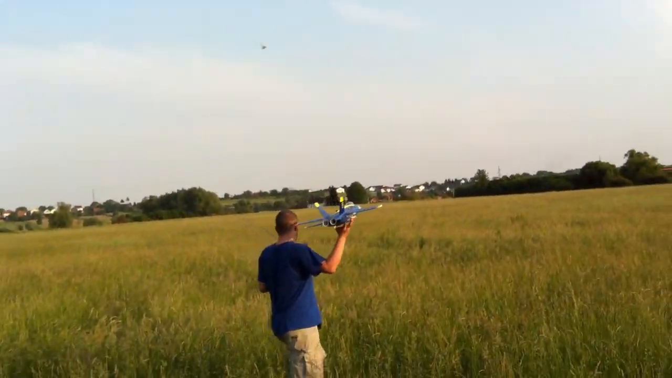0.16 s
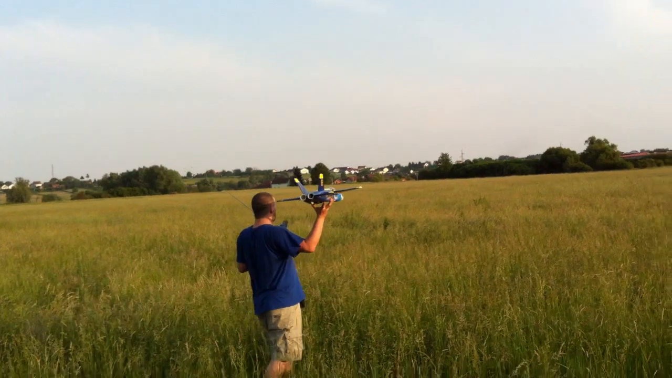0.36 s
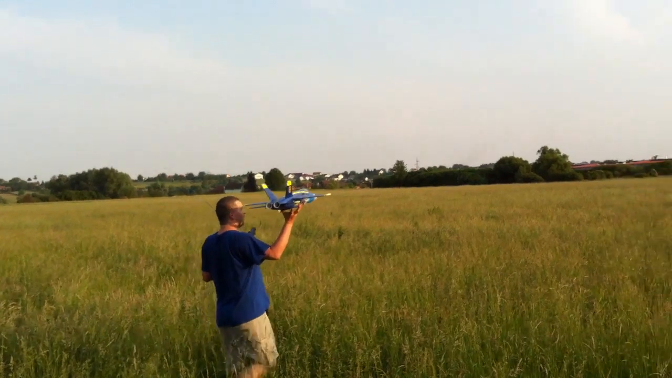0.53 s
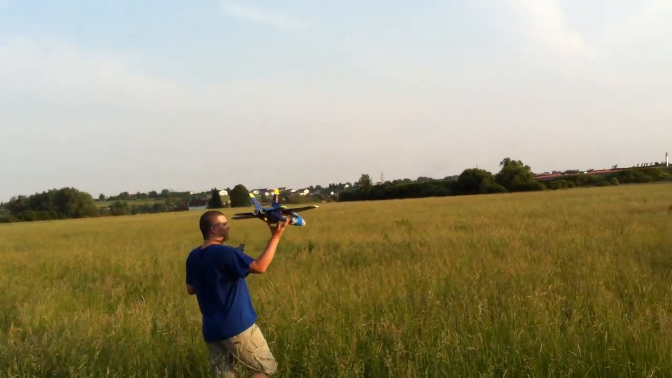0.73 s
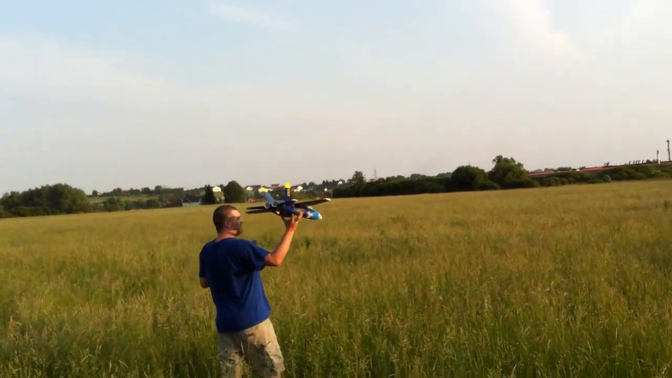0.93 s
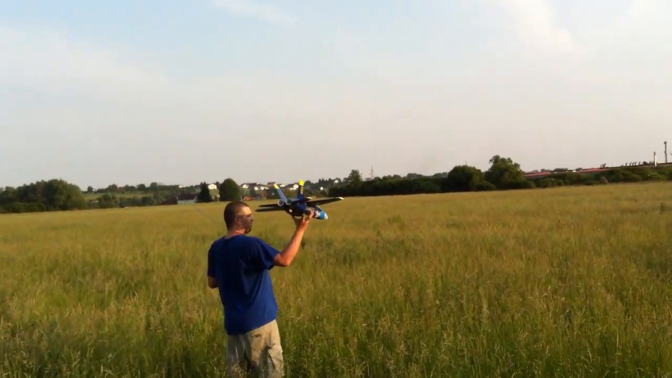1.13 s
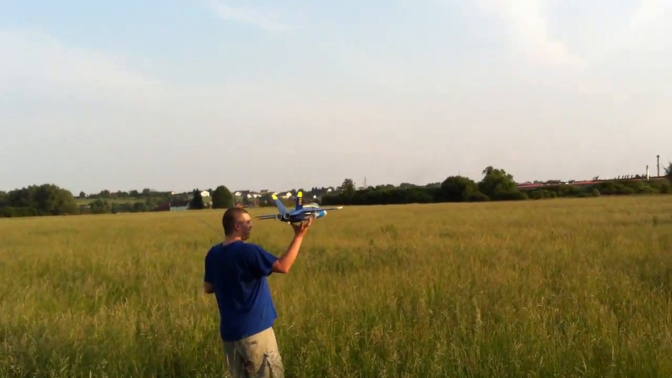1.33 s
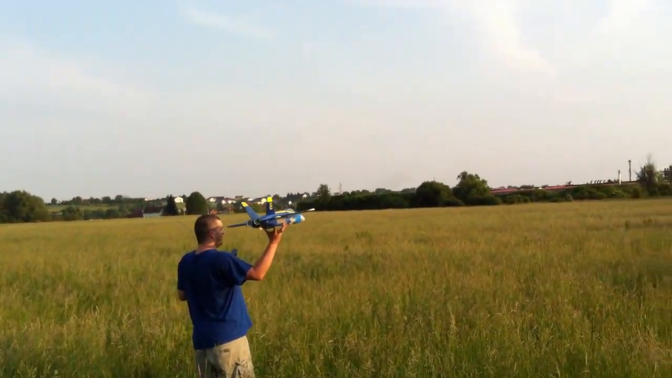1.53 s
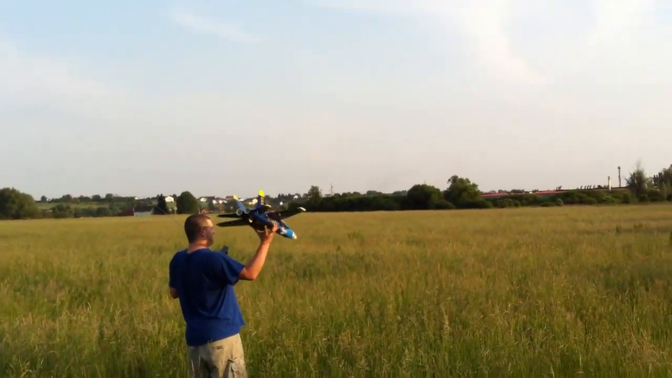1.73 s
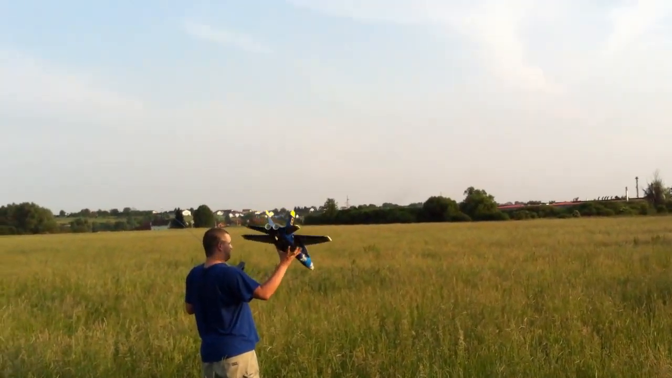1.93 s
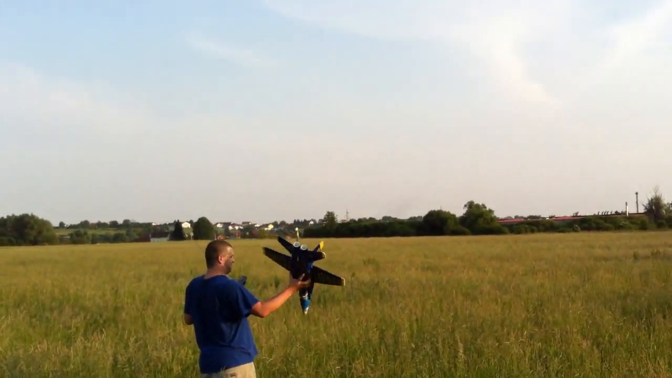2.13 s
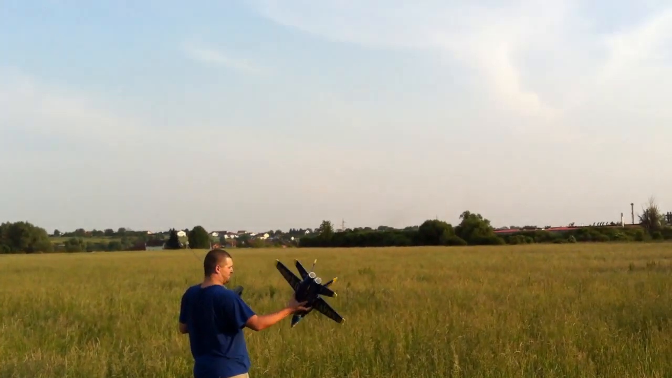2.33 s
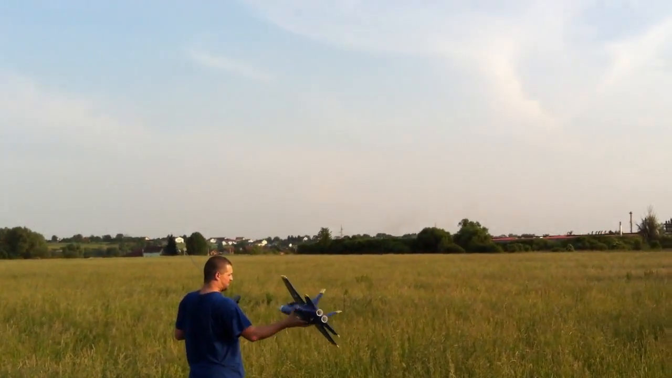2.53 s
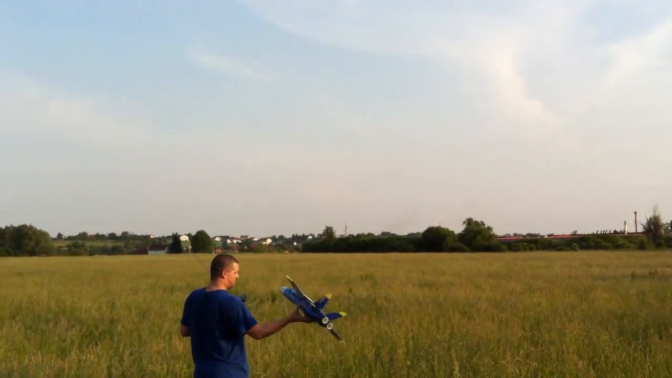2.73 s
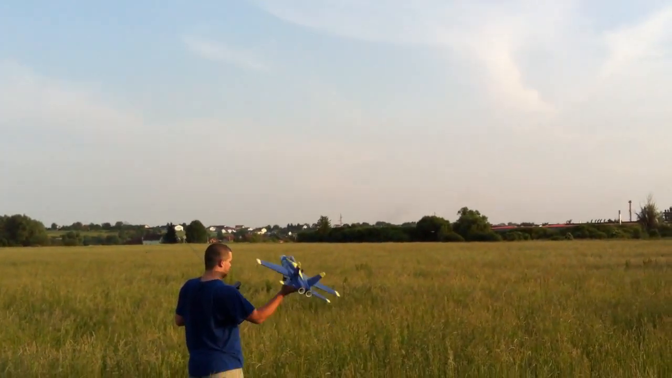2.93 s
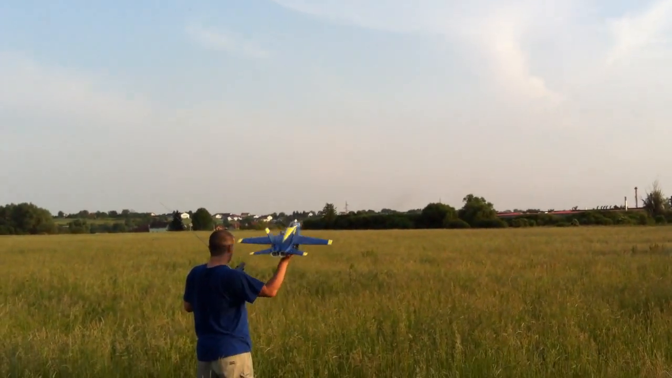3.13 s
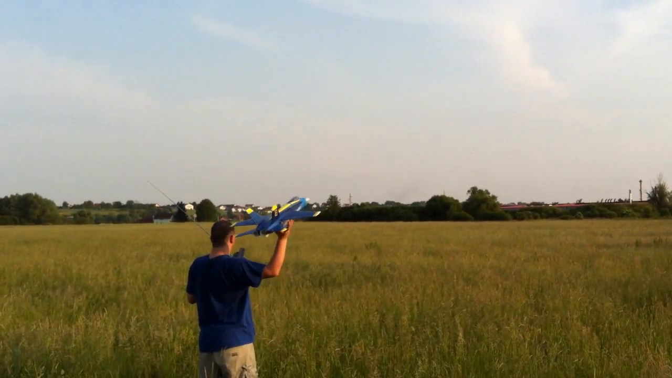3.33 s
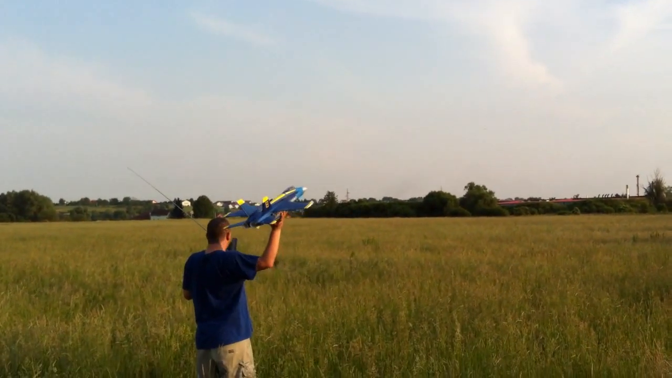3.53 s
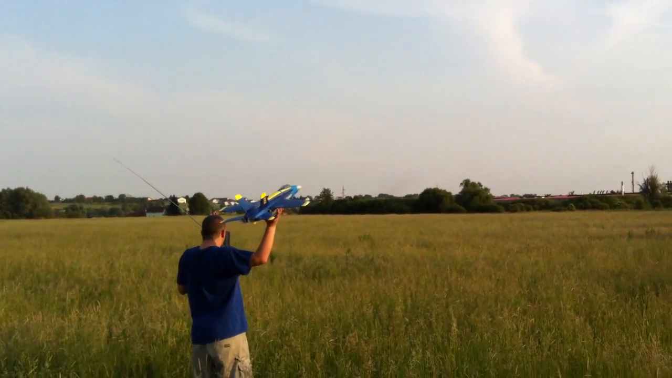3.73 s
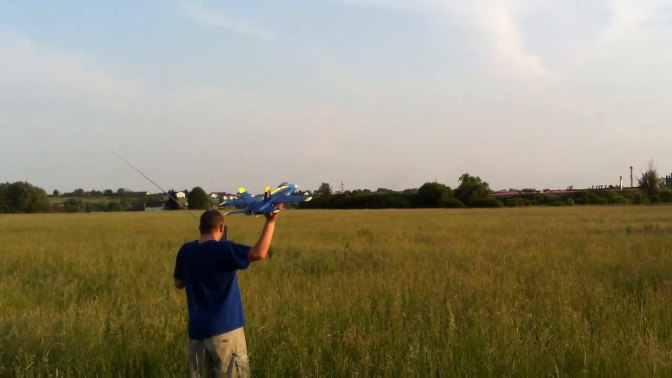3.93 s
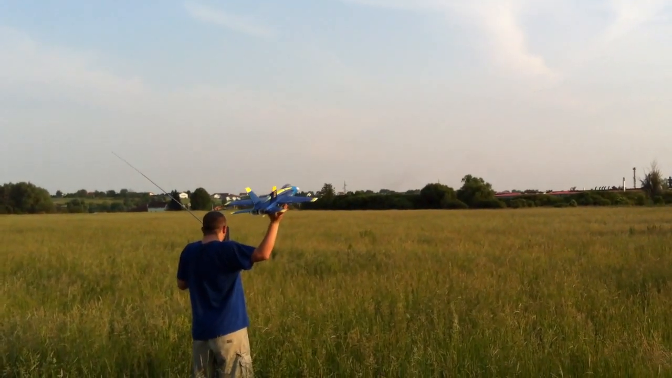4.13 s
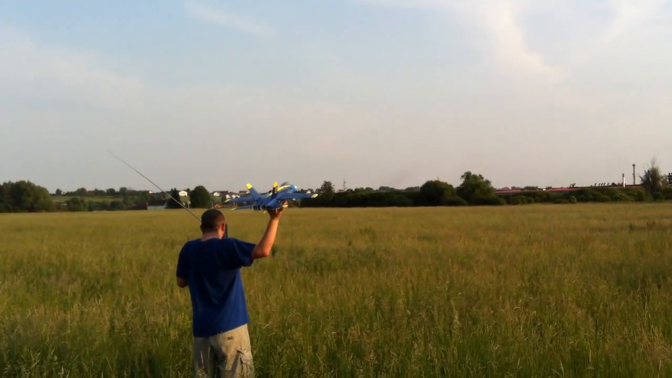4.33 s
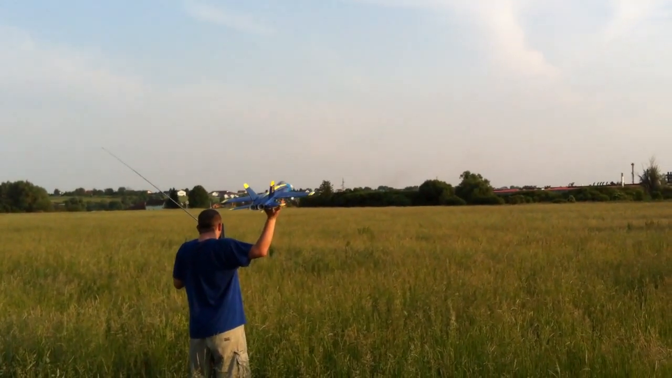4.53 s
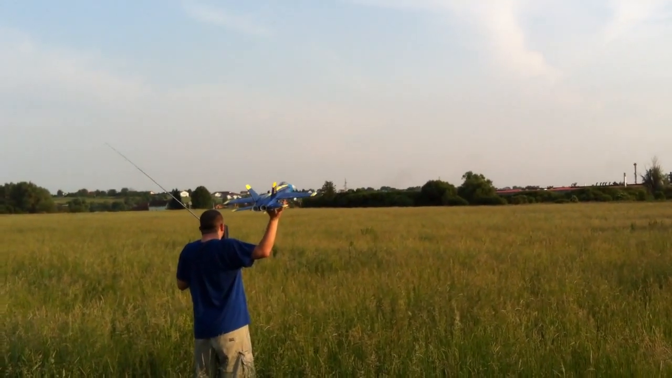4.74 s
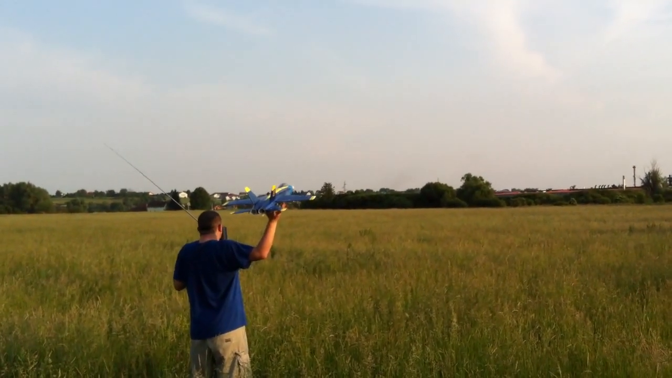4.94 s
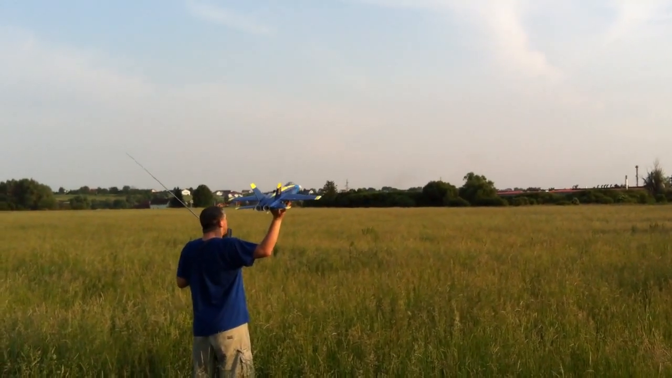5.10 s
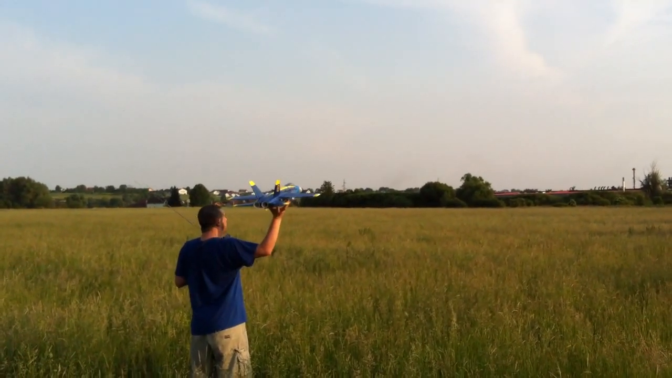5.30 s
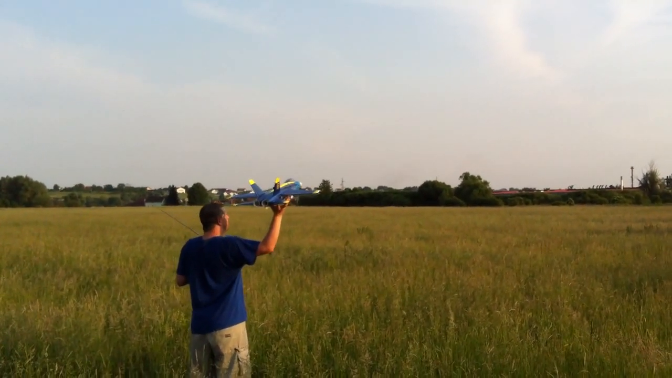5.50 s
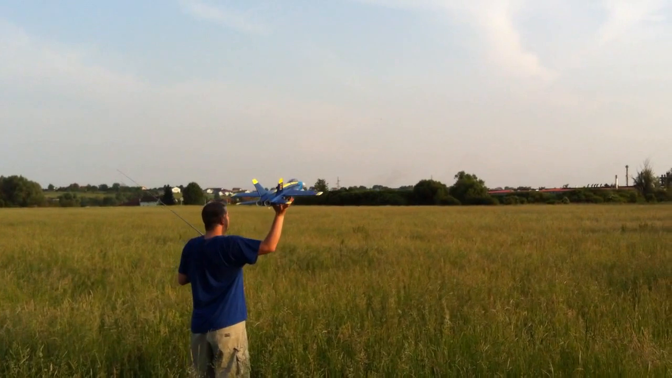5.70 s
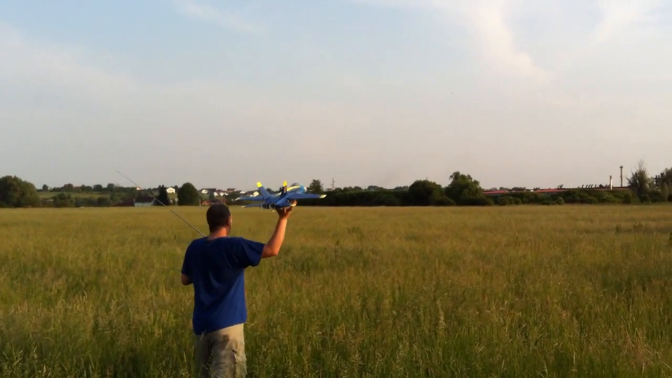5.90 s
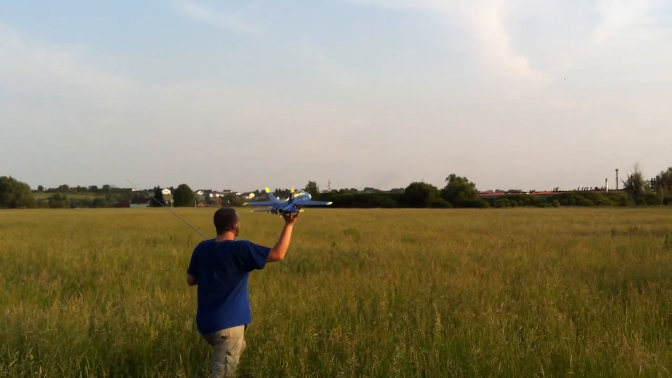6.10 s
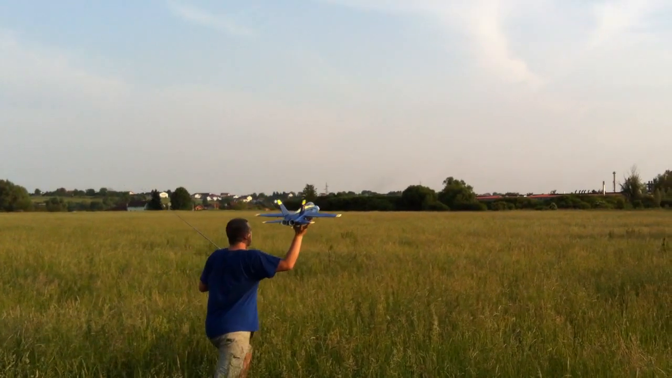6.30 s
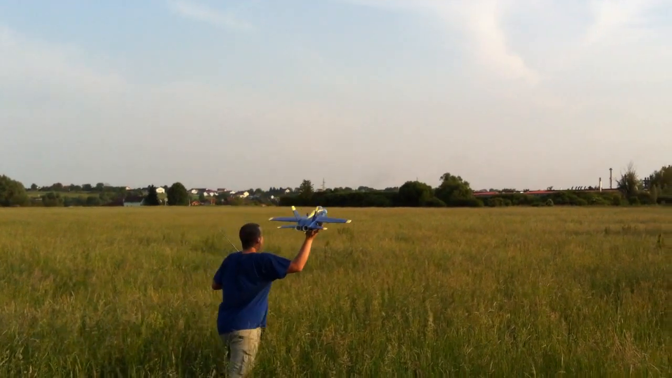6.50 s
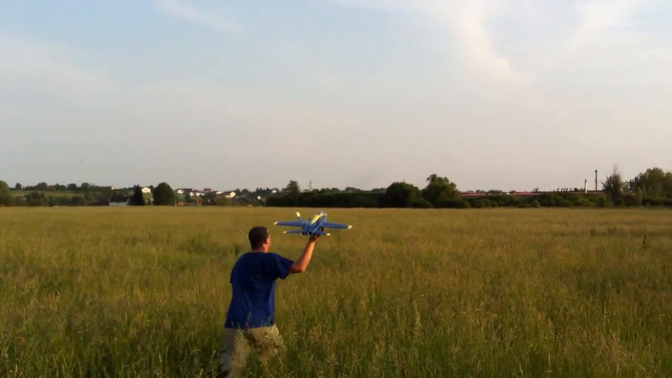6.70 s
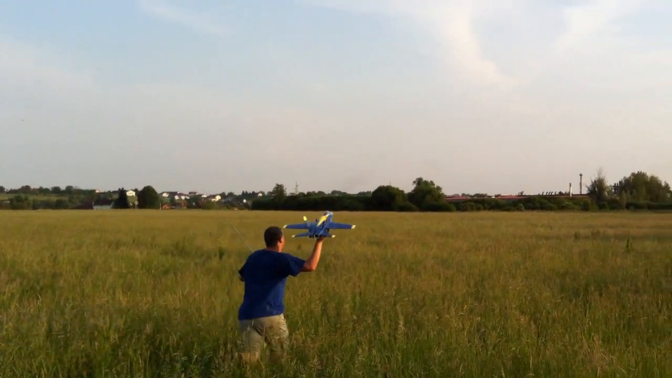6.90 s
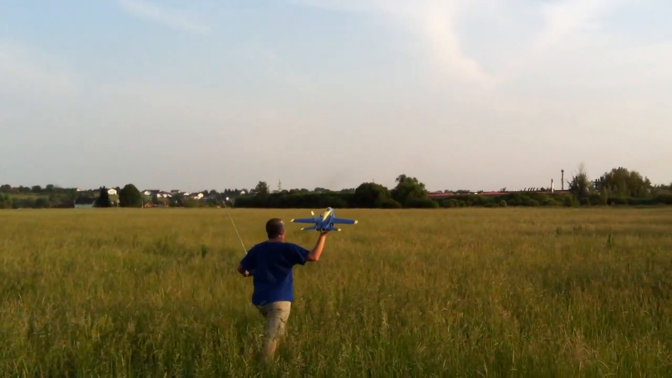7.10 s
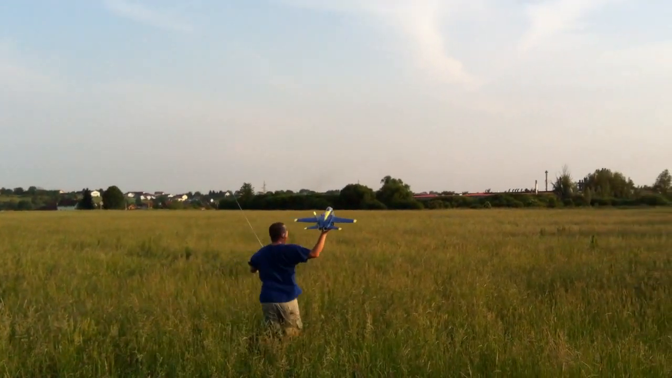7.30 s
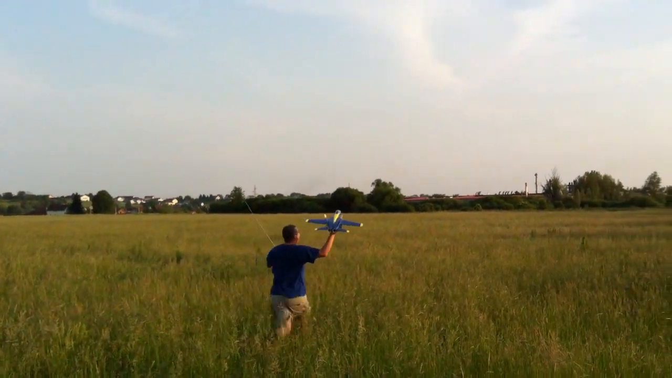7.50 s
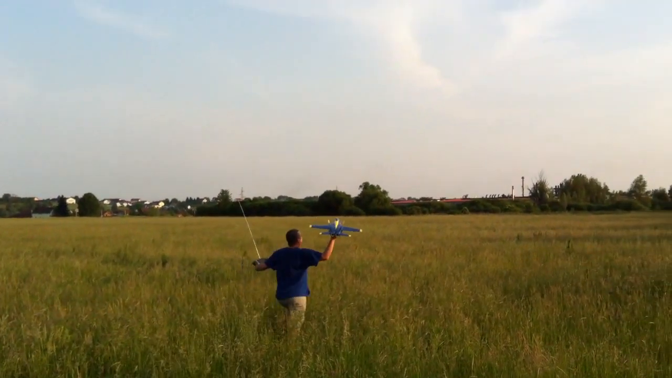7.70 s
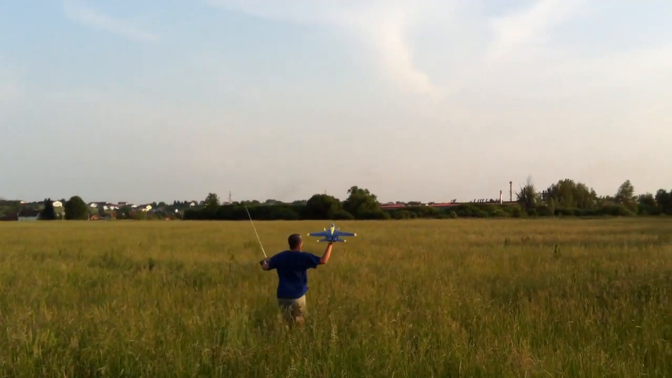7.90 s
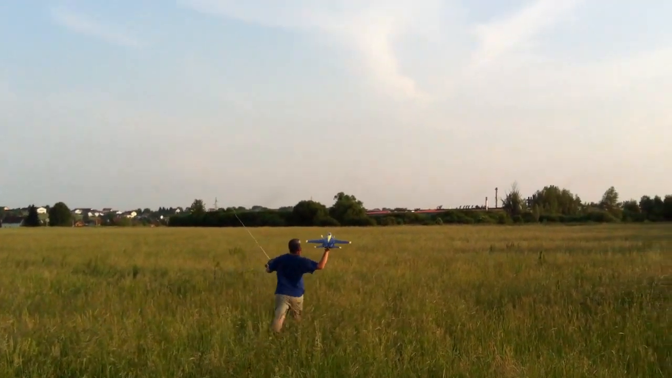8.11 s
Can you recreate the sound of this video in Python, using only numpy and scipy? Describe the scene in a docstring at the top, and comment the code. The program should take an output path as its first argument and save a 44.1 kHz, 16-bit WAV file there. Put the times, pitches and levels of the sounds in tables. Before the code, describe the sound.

Grass swishes and stalks snap amid cricket chirps; near five seconds a model jet's ducted fan whistles, surges into a rushing whine, then fades.

```python
"""A summer meadow, where a model jet with a five-bladed electric ducted fan is held up, then carried away.
Crickets chirp by pulsed tones, a far bird slurs its pitch, and long grass swishes as shaped grainy noise.
The motor controller whistles at its switching rate; the fan spools up and sounds orders of its shaft speed.
Filtered noise, echoed by the ground, makes the rush of air; whine and rush fade with distance and battery sag.
One microphone stands a few metres behind."""
import sys
import numpy as np
from scipy import signal
from scipy.fft import rfft, irfft
from scipy.io import wavfile
from scipy.ndimage import uniform_filter1d, map_coordinates

SR = 44100
rng = np.random.default_rng(int(sys.argv[2]) if len(sys.argv) > 2 else 0)


def to_wav(s):
    """Save 16-bit WAV."""
    ch = np.atleast_2d(s).T  # columns
    pcm = np.round(np.clip(ch, -1, 1) * 32767)  # PCM
    wavfile.write(sys.argv[1], SR, pcm.astype(np.int16))


N = 359415
T = np.arange(N) / SR

# Noise colours, as relative spectral density: f/Hz, level/dB per Hz
# distant hush of still evening air with far traffic
FIELD_COLOUR = [(25, -34), (55, -22), (100, -13.5), (175, 1.5), (260, -4), (420, -4), (660, -2),
                (1000, -12), (1700, -9), (2300, -19.5), (4000, -18.5), (7000, -23.5), (11000, -27.5),
                (16000, -27.5)]
# bright hiss of grass blades
SWISH_COLOUR = [(800, -10), (2500, -2.5), (4000, 1), (7000, -1.5), (12000, -3), (16000, -2)]
# low rustle of stalks
CRUSH_COLOUR = [(100, -20), (250, -2), (800, 4), (1550, 0), (2150, -2), (2800, -9), (6000, -26)]
# air rushing in the duct
RUSH_COLOUR = [(60, -60), (500, -20), (950, -1.5), (1450, -4.5), (1800, -6.5), (2400, -3), (3300, -2),
               (4200, 2), (5300, -6), (6800, -2.5), (9500, -8), (13500, -10.5), (14700, -16.5),
               (16000, -20.5)]
# exhaust behind the duct
EXHAUST_COLOUR = [(30, -50), (70, -38.5), (160, -10), (240, -1.5), (320, -4), (450, -1.5), (620, 2.5),
                  (700, -2), (820, -11.5), (1400, -25.5)]
# rough buzz of the motor controller
BUZZ_COLOUR = [(200, -20), (480, -9), (680, 6), (820, 0), (1000, 10.5), (1250, -6), (2000, 1.5),
               (4000, -28), (5600, -13), (6500, 3), (7200, -2), (8400, -3), (9200, -42)]

# soft rustling swells: t/s at the height, swell width/s, bright hiss level/dB, low rustle level/dB
RUSTLES = [(.13, 0.042, -58.5, -68), (.45, 0.11, -52.5, -51.5), (.62, 0.052, -63, -46.5),
           (.77, 0.049, -54.5, -54.5), (1.29, 0.12, -53.5, -56.5), (1.65, 0.11, -68, -60),
           (2.55, .12, -72, -60.5)]
# stalks snapping: t/s, peak level/dB, ring f/Hz, bandwidth/Hz, 60 dB decay time/s
SNAPS = [(.241, -43, 900, 1200, 0.019), (.308, -38, 878, 697, 0.056), (.452, -33.5, 4120, 900, 0.0089),
         (.468, -32.5, 1450, 900, .014), (.553, -44, 7520, 4920, .008), (.56, -33, 1200, 903, 0.016),
         (1.277, -36, 8100, 9000, .06), (1.616, -44.5, 970, 1530, 0.047), (2.62, -51, 7100, 9000, 0.011)]
# chirps close by: start t/s, level/dB before the common trim, number of wing strokes
NEAR_CHIRPS = [(.057, -46.5, 4), (.322, -47, 4), (.588, -46.5, 4), (.873, -45.5, 4), (1.166, -44.5, 4),
               (1.604, -44.5, 4), (2.026, -45.5, 4), (2.14, -53, 4), (2.283, -44, 4), (2.476, -53.5, 4),
               (2.553, -44.5, 4), (2.83, -43.5, 4), (3.118, -44, 2), (3.429, -44.5, 4), (3.704, -45, 4),
               (3.995, -44.5, 4), (4.278, -44, 4), (4.605, -44, 4), (4.908, -45, 4)]
# strokes of one chirp: t/s after the first, level/dB within the chirp, length/s
STROKES = [(0, -6, 0.02), (0.028, -2, .019), (0.062, -1, 0.022), (.104, -1.5, 0.019)]
# far crickets: wing f/Hz, period/s between chirps, greatest level/dB before stroke levels
FAR_CRICKETS = [(4990, .37, -60), (4930, .43, -61)]
# phrases of the far bird: start t/s, length/s
BIRD_PHRASES = [(2.382, 0.13), (2.905, 0.52), (3.83, .38), (4.333, 0.25)]
# shaft tone as the jet tilts: t/s, level/dB against the tone reference
SHAFT_TONE = [(5.0, 5), (5.08, 12), (5.28, -4.5), (5.36, 7), (5.48, -16), (5.72, -2), (6.2, -4),
              (6.32, 0.5), (7.0, 8.5), (7.12, -8), (7.16, 6), (7.68, 7.5), (7.8, -2.5), (8.15, 3)]
# blade tone as the jet tilts: t/s, level/dB, level/dB of its octave, both against the tone reference
BLADE_TONE = [(5.14, 3.5, -9), (5.21, 10.5, -11), (5.28, 4.5, 0), (5.41, 11.5, 2), (5.46, 1, 2),
              (5.54, 8, -1), (5.72, 9.5, 1.5), (6.14, -1.5, 4), (6.36, 5.5, 1), (6.6, -2.5, 0.5),
              (7.02, -3, -2), (7.16, 3, 1.5), (7.32, -4, 2), (7.47, 5.5, -1.5), (7.76, -3.5, 2.5),
              (8.15, 3.5, -5)]
# weaker orders: multiple of shaft f, level/dB while speeding up, level/dB at full speed, against the reference
WEAK_ORDERS = [(2, -13, -12.5), (3, -2.5, -7), (4, -4, -10), (6, -14, -14), (7, -15, -15), (8, -24, -9.5),
               (9, -13, -14), (13, -20, -26), (15, -12, -7), (20, -24, -17)]

FIELD_DB = -57.5
# grass keeps brushing the legs until they come to rest
BRUSH_DB, BRUSH_UNTIL_S, BRUSH_FADE_DB_PER_S = -60.5, 1.2, 18
# later on a neighbour falls in just behind each near chirp, at a level relative to it
ANSWER_FROM_S, ANSWER_LAG_S, ANSWER_DB = 3.6, .081, -8
BLADES, COMMUTATIONS_PER_TURN = 5, 6
# the rotor kicks off and speeds up along an S-curve; the exponent delays it
START_S, SPOOL_S, SPOOL_LATENESS = 4.84, .66, 1.08
KICK_HZ, FULL_HZ = 22, 743
# eventual loss of shaft speed as the battery sags, and its time constant
SAG_FROM_S, SAG_HZ, SAG_TIME_S = 5.63, 64.6, 5
# the jet is held still, then carried off; heights of jet and microphone are summed
DISTANCE_M, RUN_FROM_S, RUN_M_S, HEIGHTS_M = 4.25, 6.35, 2.44, 3.3
SOUND_M_S = 343
# level at full speed before the run, gain per doubling of shaft speed, loss per doubling of distance
TONE_REF_DB, RUSH_SPEED_DB, RUSH_DISTANCE_DB = -38, 13.5, 7
RUSH_ABOVE_REF_DB = 8.5
EXHAUST_DB, EXHAUST_SPEED_DB, EXHAUST_DISTANCE_DB = -37, 15.5, 6
# the controller's whistle grows with the throttle, then fades; it is gone before full throttle
WHISTLE_DB, WHISTLE_PEAK_S, WHISTLE_END_S = -32, 5.1, 5.32
WHISTLE_RISE_DB_PER_S, WHISTLE_FALL_DB_PER_S = 30, 62
# one missed beat as the motor catches: delay of its centre and Gaussian width
STUTTER_AFTER_S, STUTTER_S = .013, .003
# switching rate extrapolated to rest, and its rise at full speed
SWITCH_HZ, SWITCH_LOAD_HZ = 7911, 40
TOP_HZ = 15700


def undb(db):
    """Logarithmic levels: decibels become an amplitude ratio."""
    return 10 ** (np.asarray(db) / 20)


def curves(table):
    """Linear interpolation: table columns become straight-line courses in time."""
    s, *columns = np.transpose(table)
    return [np.interp(T, s, c) for c in columns]


def unit(x):
    """Normalisation: the signal is scaled to rms 1."""
    return x / np.sqrt(np.mean(x ** 2))


def noise(colour):
    """Spectral shaping: white noise is weighted along a log-frequency colour, then set to rms 1."""
    hz, db = np.transpose(colour)
    f = np.maximum(np.arange(N // 2 + 1) * SR / N, 1)
    weight = undb(np.interp(np.log(f), np.log(hz), db))
    return unit(irfft(rfft(rng.standard_normal(N)) * weight, N))


def walk(rate):
    """Band-limited chance: smoothed random steps of rms 1 change about rate times a second."""
    k = max(int(SR / rate), 1)
    held = np.repeat(rng.standard_normal(N // k + 1), k)
    return unit(uniform_filter1d(uniform_filter1d(held, k), k)[:N])


def turn(hz):
    """Phase as the integral of frequency, in radians."""
    return 2 * np.pi * np.cumsum(hz) / SR


def tone(phase, db):
    """Simple harmonic motion: a sine of the given rms level."""
    return np.sqrt(2) * undb(db) * np.sin(phase)


def add(out, s, x):
    """Superposition: a short sound is added in place from time s."""
    i = max(int(s * SR), 0)
    out[i:i + len(x)] += x[:max(len(out) - i, 0)]


def field(swell_db=1.0):
    """Slow amplitude modulation: the distant hush swells gently."""
    return noise(FIELD_COLOUR) * undb(FIELD_DB + swell_db * walk(1.6))


def grass(grain_db=2.0):
    """Friction and fracture: grainy hiss and low rustle swell softly, and a few stalks snap resonantly."""
    hiss = undb(BRUSH_DB - BRUSH_FADE_DB_PER_S * np.maximum(T - BRUSH_UNTIL_S, 0))
    rustle = 0
    for s, swell_s, hiss_db, rustle_db in RUSTLES:
        swell = np.exp(-.5 * ((T - s) / swell_s) ** 2)
        # independent noises add in power
        hiss = np.hypot(hiss, undb(hiss_db) * swell)
        rustle = np.hypot(rustle, undb(rustle_db) * swell)
    out = unit(noise(SWISH_COLOUR) * undb(grain_db * walk(700))) * hiss
    out += unit(noise(CRUSH_COLOUR) * undb(grain_db * walk(180))) * rustle
    t = T[:SR // 10]
    for s, db, hz, width, t60 in SNAPS:
        fibres = rng.standard_normal(len(t)) * np.exp(-np.log(1000) * t / t60)
        b, a = signal.iirpeak(hz, hz / min(width, SR / 3), fs=SR)
        ring = signal.lfilter(b, a, fibres)
        snap = signal.lfilter(b, a, ring + 0.23 * fibres)
        add(out, s, undb(db) * snap / np.abs(snap).max())
    return out


def stroke(length, hz, droop=0.043, slip=0.044):
    """Stridulation: a wing's scraper runs along the file, slowing as it goes and dropping off at the end."""
    u = np.linspace(0, 1, int(length * SR))
    phase = turn(hz * (1 - droop * u - slip * u ** 12))
    envelope = np.sin(np.pi * u ** 1.4).clip(0) ** 0.38
    return envelope * (tone(phase, 0) + tone(2 * phase, -29.5))


def chirp(hz, count):
    """Pulse train: a short run of wing strokes, each a little different in pitch and level."""
    out = np.zeros(SR // 5)
    for lag, db, length in STROKES[:count]:
        pitch, loud = rng.standard_normal(2)
        add(out, lag, undb(db + 0.85 * loud) * stroke(length, hz * (1 + .004 * pitch)))
    return out


def crickets(wing_hz=4880, near_trim_db=-2.0):
    """Periodic chorusing: near crickets chirp, a neighbour answers, far ones keep their own beat."""
    out = np.zeros(N)
    for s, db, count in NEAR_CHIRPS:
        level_db = db + near_trim_db
        add(out, s, undb(level_db) * chirp(wing_hz, count))
        if s > ANSWER_FROM_S:
            add(out, s + ANSWER_LAG_S, undb(level_db + ANSWER_DB) * chirp(wing_hz, count=4))
    for hz, period, db in FAR_CRICKETS:
        chances = rng.random((int(N / SR / period) + 1, 2))
        for k, (late, loud) in enumerate(chances):
            level_db = db + 2.8 * (loud - 1.0)
            add(out, (k + 0.5 * late) * period, undb(level_db) * chirp(hz, count=4))
    return out


def bird(song_hz=3650, song_db=-73, blur=0.76, slurs_per_s=50):
    """Frequency modulation: a songbird's quick upward and downward slurs, blurred by the distance."""
    out = np.zeros(N)
    for start, span in BIRD_PHRASES:
        for when, pitch, glide, length in rng.random((int(slurs_per_s * span), 4)):
            u = np.linspace(-1, 1, int((0.0243 + .04 * length) * SR))
            hz = song_hz * (1 + .36 * (pitch - .5) + 0.187 * (glide - .65) * u)
            add(out, start + when * span, (1 - u ** 2) * tone(turn(hz), song_db))
    return out * (0.97 + blur * walk(220))


def rotor():
    """Rotor kinematics: shaft speed in Hz rises along an S-curve, then sags exponentially with the battery."""
    throttle = np.clip((T - START_S) / SPOOL_S, 0, 1) ** SPOOL_LATENESS
    sag = SAG_HZ * (1 - np.exp(-np.maximum(T - SAG_FROM_S, 0) / SAG_TIME_S))
    return KICK_HZ + (FULL_HZ - KICK_HZ) * np.sin(np.pi / 2 * throttle) ** 2 - sag


def whistle_gain(attack_s=.002, release_s=0.057):
    """Amplitude envelope: the whistle snaps on, stutters once, swells and dies away."""
    rise_loss_db = WHISTLE_RISE_DB_PER_S * (WHISTLE_PEAK_S - T)
    fall_loss_db = WHISTLE_FALL_DB_PER_S * (T - WHISTLE_PEAK_S)
    db = WHISTLE_DB - np.maximum(rise_loss_db, fall_loss_db)
    on = np.clip(np.minimum((T - START_S) / attack_s, (WHISTLE_END_S - T) / release_s), 0, 1)
    stutter = np.exp(-((T - START_S - STUTTER_AFTER_S) / STUTTER_S) ** 2)
    return undb(db) * on * (1 - stutter)


def controller(shaft, hz, sideband_db=-21, jitter_db=-20, buzz_db=-17.5):
    """Modulation sidebands: windings whistle at the switching rate; commutation adds sidebands and a buzz."""
    carrier = turn(SWITCH_HZ + SWITCH_LOAD_HZ * hz / FULL_HZ)
    commutation = COMMUTATIONS_PER_TURN * shaft
    whistle = tone(carrier, 0) * (1 + undb(jitter_db) * walk(900))
    sidebands = tone(carrier + commutation + walk(200), sideband_db)
    sidebands += tone(carrier - commutation + walk(200), sideband_db - 13)
    sidebands += tone(carrier - 2 * commutation, sideband_db - 21.0)
    buzz = undb(buzz_db) * noise(BUZZ_COLOUR)
    return whistle_gain() * (whistle + sidebands + buzz)


def distance():
    """Uniform motion: metres from the microphone to the jet, constant until the run."""
    return DISTANCE_M + RUN_M_S * np.maximum(T - RUN_FROM_S, 0)


def air_level(hz, full_db, speed_db, distance_db):
    """Power-law scaling: level in dB grows with shaft speed and falls with distance."""
    speed_gain_db = speed_db * np.log2(hz / FULL_HZ)
    return full_db + speed_gain_db - distance_db * np.log2(distance() / DISTANCE_M)


def fan(shaft, hz, ref_db, flutter_db=1.6, order_flutter_db=3.0, smear=0.65, stall_smear=0.82, sway_db=1):
    """Rotor harmonics: imbalance sings at the shaft rate, the blades at five times that, in ragged inflow."""
    shaft_db, blade_db, octave_db = ref_db + np.array(curves(SHAFT_TONE) + curves(BLADE_TONE))
    # until the air flow catches up, the blades meet it badly and sound rougher
    labour = np.clip((.965 * FULL_HZ - hz) / 50, 0, 1)
    # the jet sways in the hand during the run
    sway = sway_db * np.clip(T - RUN_FROM_S, 0, 1)
    blade = BLADES * shaft + stall_smear * labour * walk(160)
    blade_flutter_db = flutter_db * (1 + labour)
    out = tone(shaft, shaft_db + 1.0 * walk(13))
    out += tone(blade, blade_db + sway * walk(9.9) + blade_flutter_db * walk(50))
    out += tone(2 * blade, octave_db + blade_flutter_db * walk(50))
    for multiple, rising_db, full_db in WEAK_ORDERS:
        db = ref_db + labour * rising_db + (1 - labour) * full_db
        out += tone(multiple * shaft + smear * walk(90), db + order_flutter_db * walk(30))
    return out


def over_ground(x, share):
    """Image-source interference: an echo off the meadow joins the direct sound, sooner at greater distance."""
    lag_s = (np.hypot(distance(), HEIGHTS_M) - distance()) / SOUND_M_S
    echo = map_coordinates(x, [(T - lag_s) * SR], order=3)
    return (x + share * echo) / np.hypot(1, share)


def airflow(rush_db, exhaust_db, churn_db=0.6):
    """Turbulence noise: hiss in the duct, rumble behind it; the grass reflects the rumble better."""
    rush = over_ground(noise(RUSH_COLOUR), share=0.22) * undb(rush_db)
    exhaust = over_ground(noise(EXHAUST_COLOUR), share=0.6) * undb(exhaust_db)
    return (rush + exhaust) * undb(churn_db * walk(45))


def scene():
    """Linear superposition: the jet and the meadow, alike in both channels."""
    hz = rotor()
    ref_db = air_level(hz, TONE_REF_DB, RUSH_SPEED_DB, RUSH_DISTANCE_DB)
    exhaust_db = air_level(hz, EXHAUST_DB, EXHAUST_SPEED_DB, EXHAUST_DISTANCE_DB)
    shaft = turn(hz * (1 + 0.00048 * walk(25)))
    # air only starts to move once the rotor gathers speed
    moving = np.clip((hz - KICK_HZ) / 170, 0, 1)
    jet = controller(shaft, hz) + moving * fan(shaft, hz, ref_db)
    jet += moving ** 2 * airflow(ref_db + RUSH_ABOVE_REF_DB, exhaust_db)
    meadow = field() + grass() + crickets() + bird()
    mono = meadow + jet
    return np.array([mono, mono])


def record(dry):
    """Band limitation: a steep elliptic low-pass removes the extreme treble."""
    low_pass = signal.ellip(10, .2, 80, TOP_HZ, fs=SR, output="sos")
    return signal.sosfilt(low_pass, dry)


dry = scene()
out = record(dry)
to_wav(out)
```